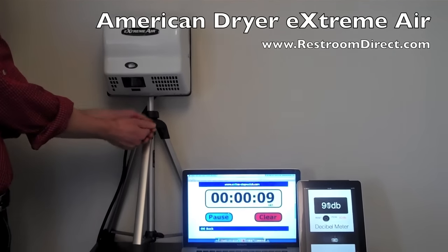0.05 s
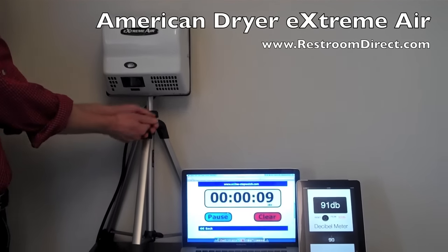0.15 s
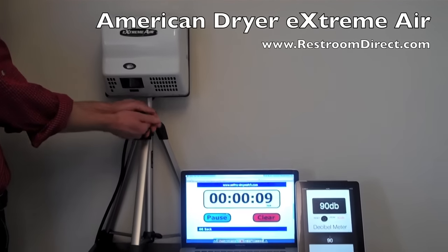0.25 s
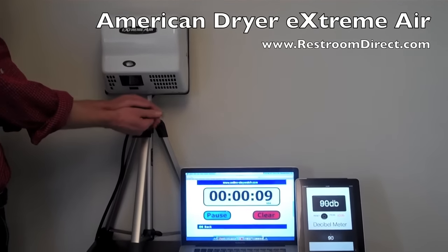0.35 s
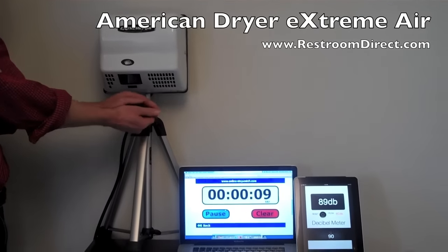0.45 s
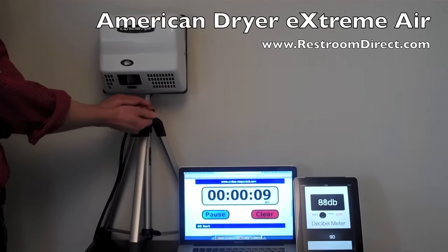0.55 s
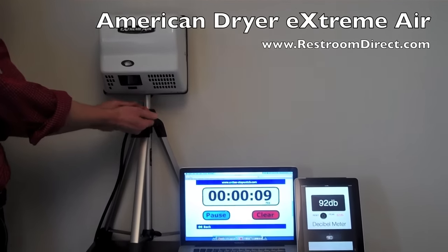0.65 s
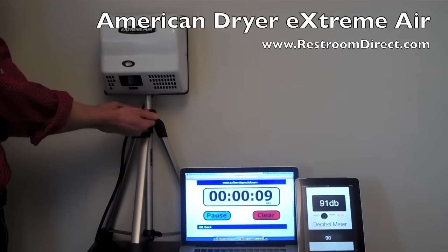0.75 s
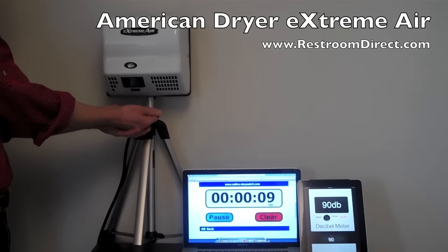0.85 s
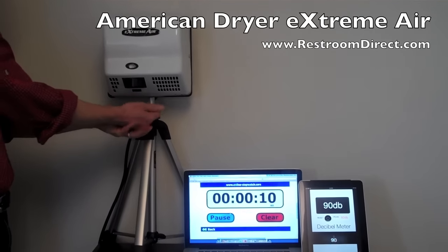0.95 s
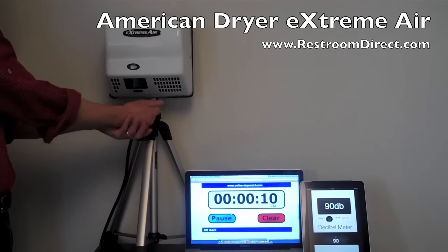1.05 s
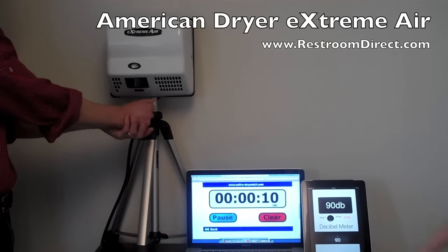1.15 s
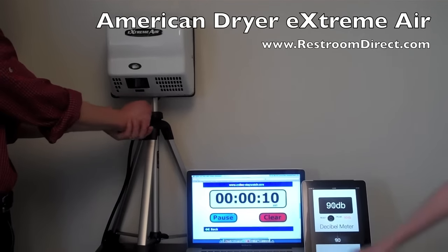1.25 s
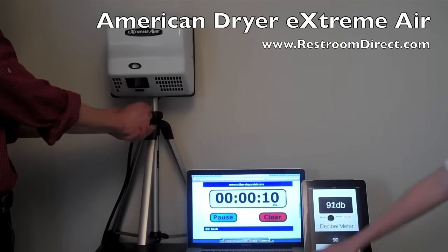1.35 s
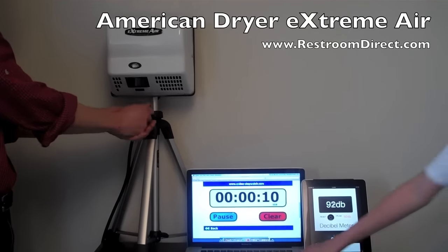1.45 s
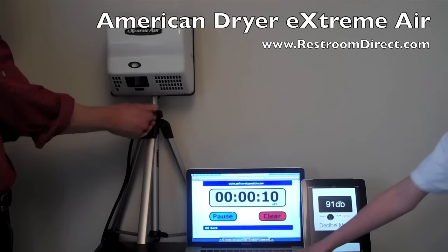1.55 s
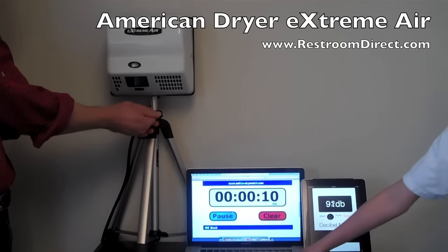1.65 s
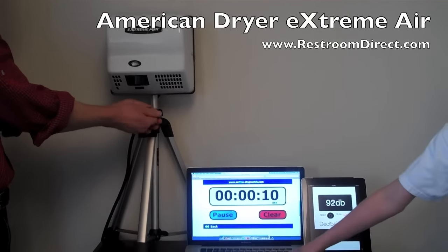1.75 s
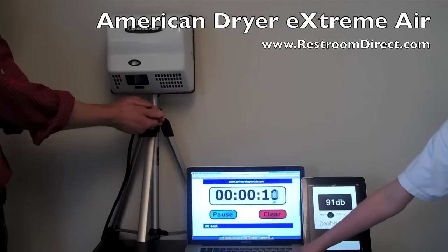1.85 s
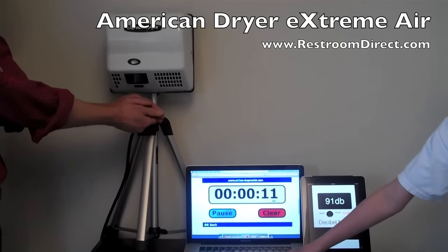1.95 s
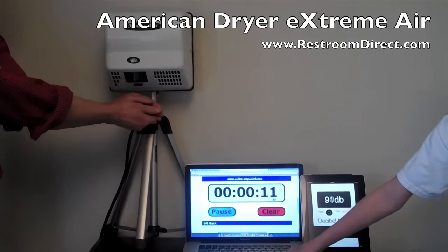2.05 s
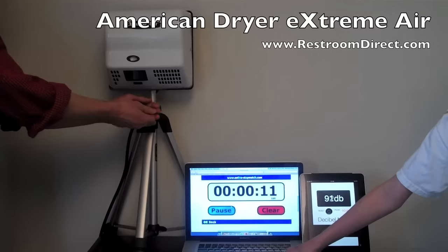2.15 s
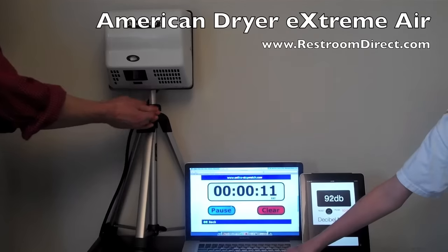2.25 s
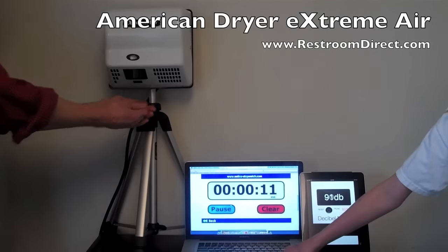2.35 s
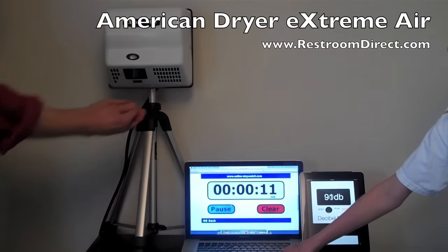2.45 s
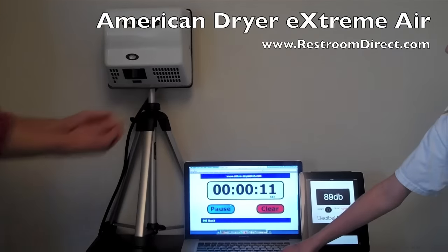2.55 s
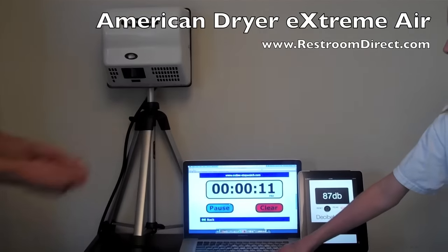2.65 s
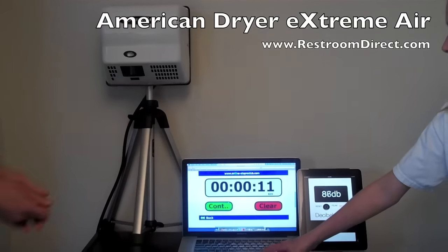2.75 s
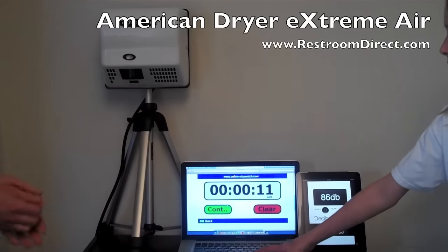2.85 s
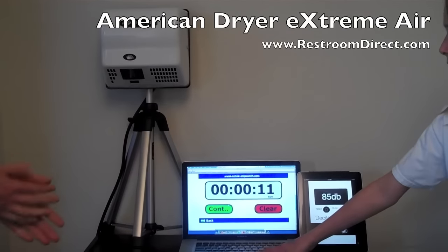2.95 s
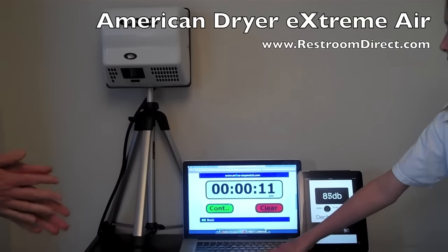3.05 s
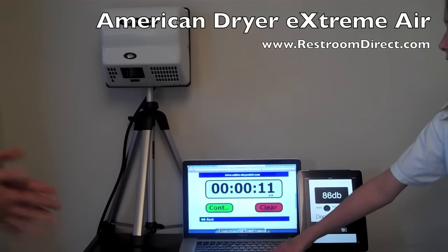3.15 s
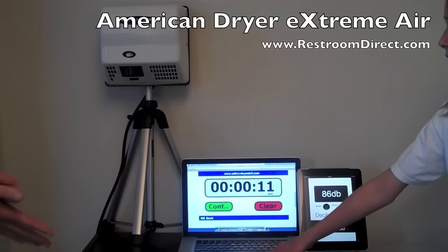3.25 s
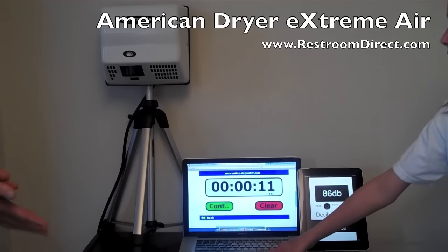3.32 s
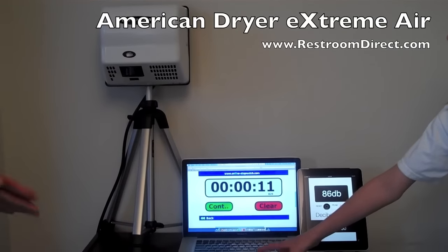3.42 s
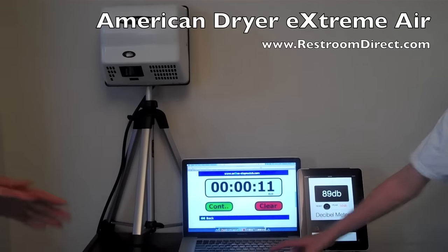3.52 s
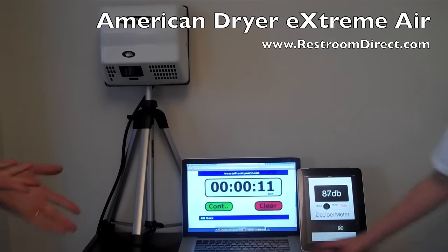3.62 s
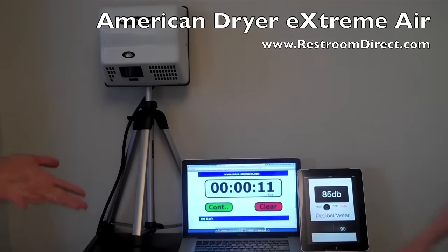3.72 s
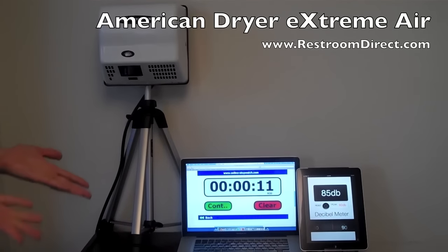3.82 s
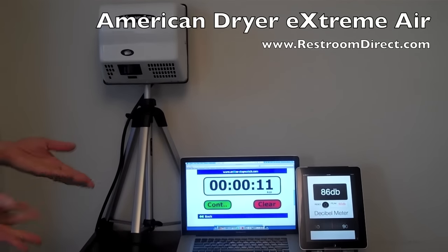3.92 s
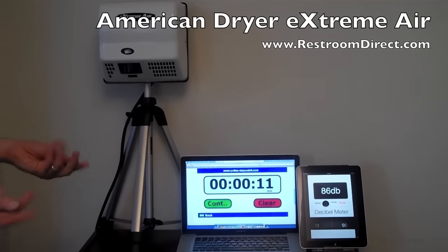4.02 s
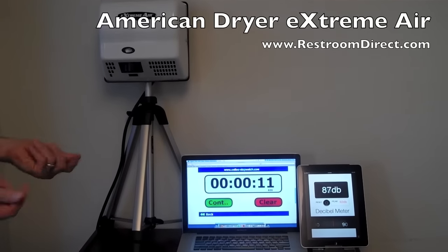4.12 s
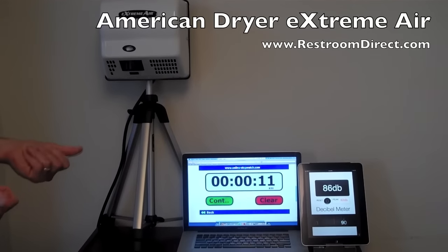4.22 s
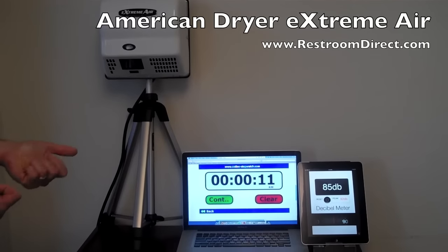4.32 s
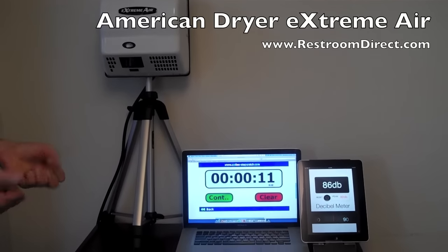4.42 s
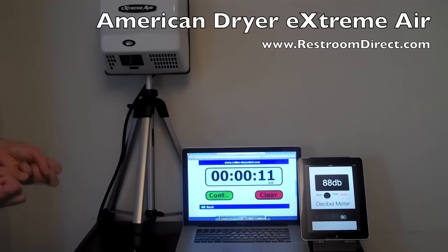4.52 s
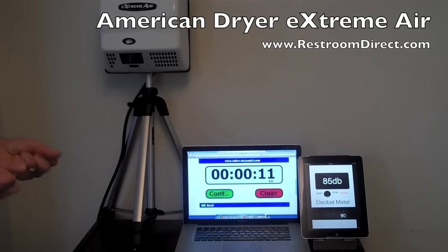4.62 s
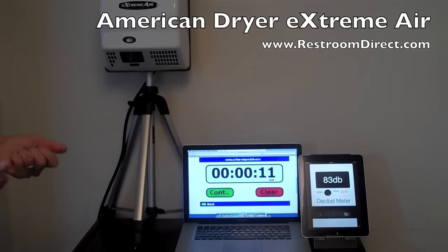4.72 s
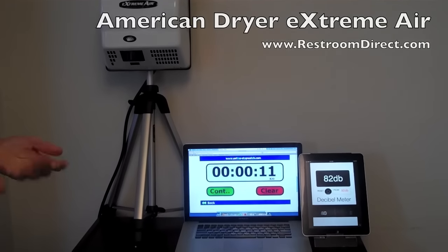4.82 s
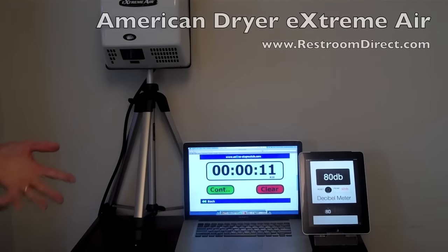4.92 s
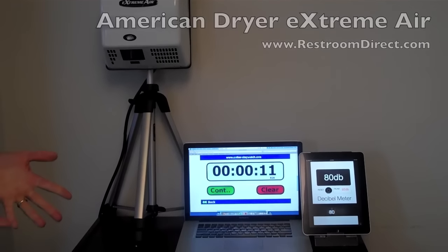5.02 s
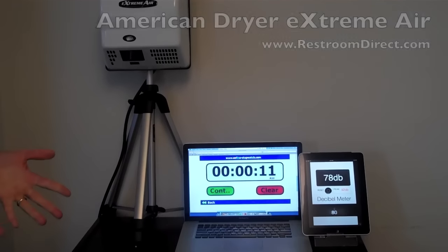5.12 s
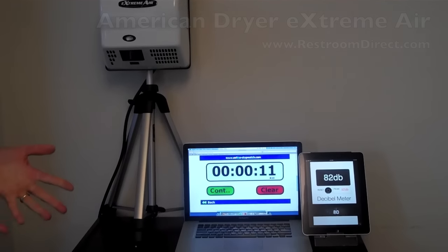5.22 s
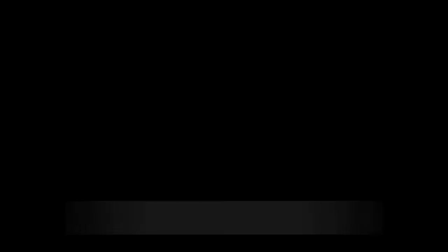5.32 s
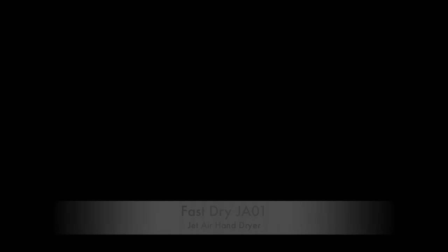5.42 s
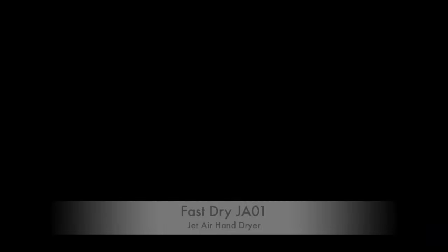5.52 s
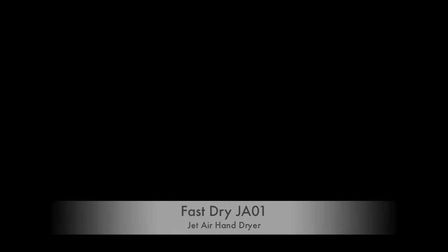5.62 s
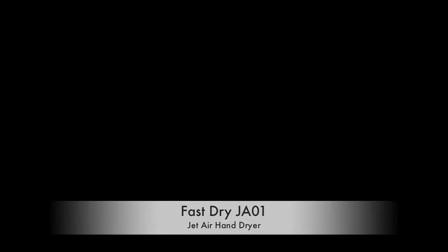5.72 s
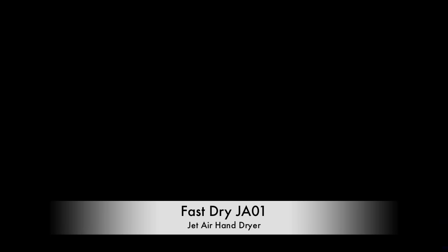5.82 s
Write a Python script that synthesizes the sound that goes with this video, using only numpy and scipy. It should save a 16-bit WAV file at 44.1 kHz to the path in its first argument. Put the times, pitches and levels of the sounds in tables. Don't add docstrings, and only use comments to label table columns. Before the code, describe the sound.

In a small bare room, a powerful hand dryer is already blasting. Hands rub in the airstream, making the roar hiss, flutter and honk hollowly in quick, irregular swells. After about two and a half seconds they pull away, leaving a steadier, quieter rush with a high whine. Near the end the motor starts slowing and the sound stops dead. Close, loud, slightly saturated stereo pickup.

```python
import sys
import numpy as np
from scipy import signal
from scipy.fft import rfft, irfft, next_fast_len
from scipy.io import wavfile
from scipy.ndimage import uniform_filter1d

SR = 44100
rng = np.random.default_rng(int(sys.argv[2]) if len(sys.argv) > 2 else 0)


def unload_wav(signal):
    wavfile.write(
        sys.argv[1],
        SR,
        np.round(np.clip(np.atleast_2d(signal).T, -1, 1) * 32767).astype(np.int16),
    )


def nominal_scale(level):
    x = np.asarray(level, float) / 20
    return 10 ** x


N = 258856

RUN_HZ = 3514.5
LEAVE_S = 2.455
RISE_S, FALL_S = .012, .085


def jet():
    # frequency in Hz, level in dB per Hz.
    stream_spectrum = [(18, -75), (30, -44.5), (382, -11.5), (576, -14.5), (804, -2.5), (987, -10),
                       (1340, -13), (1740, -9), (2620, -11.5), (3390, -10.5), (4060, -13.5), (5380, -10),
                       (5960, -16), (10800, -20.5), (13900, -33.5)]
    # frequency in
    # Hz, width in Hz, lift in dB.
    housing_modes = [(95, 25, 4), (150, 30, 4), (200, 25, 4), (250, 30, 3), (495, 30, 5), (545, 25, 4),
                     (650, 35, 7), (715, 30, 4), (760, 30, 4), (812, 26, 10), (858, 25, -3), (890, 30, 4),
                     (985, 30, -3), (1075, 30, 5), (1770, 55, 6), (1915, 50, 5), (3130, 160, 4),
                     (4960, 70, 3), (5220, 120, 4), (5400, 150, 5), (6430, 140, 3), (8160, 150, 3)]
    level_db, level_slope = -21.5, 2.14
    dull_slope, blocked_tilt_db = 0.45, .4
    hz, t = frames()
    treble_octaves = np.log2(np.maximum(hz, 900) / 900)
    bass_octaves = np.log2(250 / np.clip(hz, 30, 250))
    octaves_out = treble_octaves + 0.56 * bass_octaves
    tilt_db = dull_slope * speed(t)[1] + blocked_tilt_db * (t < LEAVE_S)
    shape_db = read(stream_spectrum, hz) + tilt_db * octaves_out
    stream = turbulence(shape_db, patchy_db=.6, gust_db=.25)
    slow_db = speed(np.arange(N) / SR)[1]
    return nominal_scale(level_db + level_slope * slow_db) * lift(stream, housing_modes, share=1)


def hands():
    # start in seconds, hold in seconds, level in dB, first and last pitch in Hz.
    cups = [(.03, 0.065, -16.5, 1590, 1600), (.22, .2, -30.5, 1800, 1820), (.46, .04, -20.5, 1550, 1600),
            (.56, 0.11, -13, 1720, 1780), (.7, 0.093, -14.5, 1750, 1850), (.81, .14, -12.5, 2030, 2150),
            (1.03, .12, -14, 2080, 2160), (1.31, .07, -14.5, 1600, 1563), (1.47, 0.083, -15.5, 1370, 1460),
            (1.63, 0.14, -14, 1370, 1300), (1.78, 0.19, -15.5, 1370, 1630), (2.04, 0.081, -19, 1500, 1380),
            (2.18, 0.062, -17, 1320, 1418), (2.29, 0.22, -19.5, 1600, 1717)]
    # start in seconds, hold in seconds, level in dB.
    sweeps = [(.05, .1, -25), (.17, 0.18, -19), (.42, .06, -19.5), (.51, 0.082, -13), (.99, .22, -20.5),
              (1.22, 0.17, -17), (1.46, 0.19, -18), (1.68, 0.26, -15.5), (2.01, 0.14, -12.5),
              (2.29, 0.066, -21.5), (2.365, 0.064, -18.5)]
    # start in seconds, hold in seconds, level in dB, first and last pitch in Hz.
    slits = [
        (0, .08, -27.5, 2890, 2850),
        (.26, 0.04, -21.5, 2850, 2860),
        (.512, 0.05, -16.5, 2840, 3200),
        (.74, 0.2, -21, 2520, 2560),
        (1.08, 0.13, -21.5, 2700, 2900),
        (1.34, 0.28, -22, 2650, 2780),
        (1.88, 0.091, -19.5, 2650, 2700),
        (2.05, 0.047, -20.5, 2850, 2950),
    ]
    # start in seconds, hold in seconds, level in dB.
    flaps = [
        (.04, .08, -22.5),
        (.68, .15, -20.5),
        (.95, .1, -26.5),
        (2.17, .04, -27),
        (2.29, .16, -20.5),
    ]
    # frequency in Hz, level in dB per Hz.
    splash_spectrum = [(530, -75), (900, -6.5), (1020, -12.5), (1380, -3.5), (1980, -4), (2960, -3),
                       (5260, -5.5), (6100, -11), (10600, -16), (13900, -32.5)]
    buffet_spectrum = [(30, -61), (80, -43), (150, -23.5), (300, -5), (600, 0.5), (900, 3), (1300, 4),
                       (2000, -39.5)]
    # frequency in Hz, width in Hz, lift in dB.
    gap_modes = [(1150, 35, 5), (1243, 35, 5), (1305, 28, 4), (1408, 30, 8), (1480, 28, 4), (1590, 50, 6),
                 (1755, 35, 3), (1834, 45, 4), (2055, 40, 3), (2105, 35, 3), (2200, 45, 4), (2306, 30, 3),
                 (2455, 35, 4), (2655, 35, 4), (5380, 120, 4)]

    hz, t = frames()
    palm_db = 40 * np.log10(1 + (1050 / (hz + 1)) ** 4) / 2
    pitch = slide(cups, t)
    detune = 2 * (hz - pitch) / (.155 * pitch)
    hollow_db = -9.5 * np.log10(1 + detune ** 2) - palm_db
    hollow = turbulence(hollow_db, patchy_db=1.26, gust_db=-0.3)
    pitch = slide(slits, t)
    detune = 2 * (hz - pitch) / (0.2 * pitch)
    slit_db = -12 * np.log10(1 + detune ** 2) - palm_db
    slit = turbulence(slit_db, patchy_db=2.5, gust_db=1.4)
    splash = turbulence(read(splash_spectrum, hz) + 0 * t, patchy_db=1.5, gust_db=-0.98)
    buffet = turbulence(read(buffet_spectrum, hz) + 0 * t, patchy_db=1.5, gust_db=-3.4)
    hollow = lift(hollow, gap_modes, share=1)
    splash = lift(splash, gap_modes, share=1.0)

    mix = moves(slits, rest_db=-31) * slit
    mix = mix + nominal_scale(-2.0) * moves(cups, rest_db=-24.5) * hollow
    mix = mix + nominal_scale(-0.5) * moves(sweeps, rest_db=-19.5) * splash
    mix = mix + nominal_scale(-3.0) * moves(flaps, rest_db=-22.5) * buffet
    linger_s = 0.036
    return mix * np.exp(-np.maximum(np.arange(N) / SR - LEAVE_S, 0) / linger_s)


def motor():
    # frequency in Hz, width in Hz, lift in dB.
    waves = [(349, 22, 11), (2195, 60, 7), (2450, 380, -7), (2775, 100, 10), (2990, 140, 4), (3245, 50, 1),
             (3430, 40, 1), (3340, 80, -10), (3150, 70, -9), (2865, 50, -8), (2680, 60, -4)]
    # middle in seconds, length in seconds, change in dB.
    shades = [
        (1.1, .4, -3),
        (2.5, .4, -2.1),
        (3.58, .22, -10),
        (3.83, .07, -8),
        (4.39, .05, -3),
    ]
    blades = 9
    t = np.arange(N) / SR
    share, slow_db = speed(t)
    blade_hz = RUN_HZ * share
    shaft_hz = blade_hz / blades
    blade_db = resonance_db(waves, blade_hz) - 32.5 + 3.5 * slow_db
    shaft_db = resonance_db(waves, shaft_hz) - 43 + 3.2 * slow_db
    for middle, length, db in shades:
        blade_db = blade_db + db * np.exp(-(2 * (t - middle) / length) ** 2)
    waver, flutter = (slow_noise(v) for v in rng.standard_normal((2, N)))
    turns = np.cumsum(shaft_hz * (1 + .0008 * waver)) / SR
    lag = np.array([[0], [.5]])
    whine = nominal_scale(blade_db + 1.24 + 1.3 * flutter) * np.sin(2 * np.pi * blades * turns - lag)
    hum = nominal_scale(shaft_db + 1.7) * np.sin(2 * np.pi * turns)
    return np.sqrt(2) * (whine + hum)


def speed(t):
    off_s, coast_s, rub_per_s2 = 4.395, 1.64, .07
    sag_hz_per_s = 1.2
    off = np.maximum(t - off_s, 0)
    share = (1 - sag_hz_per_s * t / RUN_HZ) / (1 + off / coast_s + rub_per_s2 * off ** 2)
    return share, 20 * np.log10(share)


def moves(rows, rest_db):
    t = np.arange(0, N + 64, 64) / SR
    start, hold, db = np.transpose(rows)[:3, :, None]
    rise = (t - start) / RISE_S
    fall = 1 - (t - start - RISE_S - hold) / FALL_S
    shape = np.clip(np.minimum(rise, fall), 0, 1)
    power = (nominal_scale(db) ** 2 * shape ** 2).sum(0) + nominal_scale(rest_db) ** 2
    return np.interp(np.arange(N) / SR, t, np.sqrt(power))


def slide(rows, t):
    start, hold, _, from_hz, to_hz = np.transpose(rows)
    held = start + RISE_S
    times = np.maximum.accumulate(np.ravel([held, held + hold], "F"))
    return np.interp(t, times, np.ravel([from_hz, to_hz], "F"))


def turbulence(shape_db, patchy_db, gust_db):
    # frequency in Hz, left-right coherence from 0 to 1.
    likeness = [(60, 0.82), (110, 1), (200, 0.99), (360, 0.97), (670, 1), (1210, 0.84), (2220, 0.6),
                (4040, 0.45), (7380, 0.24), (13500, 0.22)]
    bins, count = shape_db.shape
    a, b, c, d, patches = rng.standard_normal((count, bins, 5)).T
    patches = uniform_filter1d(patches, size=20, axis=0)
    patches = evened(uniform_filter1d(patches, size=5, axis=1))
    gusts = evened(uniform_filter1d(rng.standard_normal(count), size=3))
    gain = nominal_scale(shape_db)
    gain = gain / np.sqrt((gain ** 2).mean(0))
    gain = gain * nominal_scale(patchy_db * patches + gust_db * gusts)
    same = np.clip(read(likeness, frames()[0]), 0, 1)
    left = a + 1j * b
    right = same * left + np.sqrt(1 - same ** 2) * (c + 1j * d)
    spectra = gain * np.array([left, right])
    return evened(signal.istft(spectra, nperseg=2048, noverlap=1536)[1][:, :N])


def frames():
    return np.fft.rfftfreq(2048, 1 / SR)[:, None], np.arange(N // 512 + 5) * 512 / SR


def resonance_db(modes, hz):
    return sum(db / (1 + (2 * (hz - f) / width) ** 2) for f, width, db in modes)


def lift(x, modes, share):
    size = next_fast_len(N)
    hz = np.fft.rfftfreq(size, 1 / SR)
    gain = nominal_scale(share * resonance_db(modes, hz))
    return evened(irfft(rfft(x, size) * gain, size)[:, :N])


def slow_noise(x):
    return evened(uniform_filter1d(uniform_filter1d(x, size=1500), size=1500))


def evened(x):
    return x / np.sqrt(np.mean(x ** 2) + 1e-20)


def read(points, hz):
    f, value = np.transpose(points)
    return np.interp(np.log(hz + 1), np.log(f + 1), value)


def room(x, wet_db):
    # frequency in Hz, time to fall 60 dB in seconds.
    decay = [(100, 0.3), (1000, 0.49), (4000, 0.35), (12000, 0.25)]
    hz, t, z = signal.stft(rng.standard_normal(SR // 2), SR, nperseg=256)
    z *= nominal_scale(-60 * t / read(decay, hz)[:, None]) * (t > .004)
    z /= np.sqrt((abs(z) ** 2).sum(-1))[:, None]
    tail = signal.istft(z, SR, nperseg=256)[1]
    tail *= nominal_scale(wet_db) / np.linalg.norm(tail)
    tail[0] += 1
    return signal.fftconvolve(x, tail[None] / np.linalg.norm(tail), axes=1)[:, :N]


def scene():
    return room(jet() + hands() + motor(), wet_db=-9.0)


def roll_off(x):
    return signal.sosfilt(signal.butter(12, 14070, fs=SR, output="sos"), x)


def record(dry):
    # frequency in Hz, left minus right in dB.
    balance = [(60, 2), (120, -2.5), (230, 0), (460, -3.5), (900, -1.0), (1770, -1.0), (3480, -3),
               (8000, 0.5), (11500, -1)]
    end_s, snip_s = 5.3155, .002
    fade_s, fade_db = .08, -5.5
    size = next_fast_len(N)
    hz = np.fft.rfftfreq(size, 1 / SR)
    side_db = read(balance, hz) / 2
    top_db = -5.0 * np.minimum(hz / 13500, 1.5) ** 8
    gain = nominal_scale([top_db + side_db, top_db - side_db])
    ports = irfft(rfft(dry, size) * gain, size)[:, :N]
    rounded = ports / (1 + abs(1.03 * ports) ** 6) ** (1 / 6)
    left_s = end_s - np.arange(N) / SR
    dip = nominal_scale(fade_db * np.clip(1 - left_s / fade_s, 0, 1))
    ending = np.clip(left_s / snip_s, 0, 1) * dip
    return roll_off(rounded * ending)


dry = scene()
out = record(dry)
unload_wav(out)
```